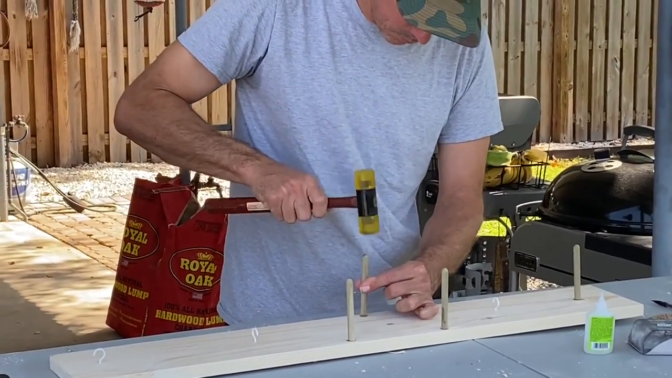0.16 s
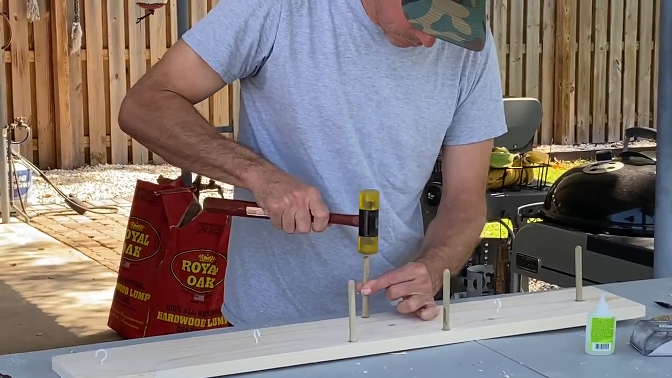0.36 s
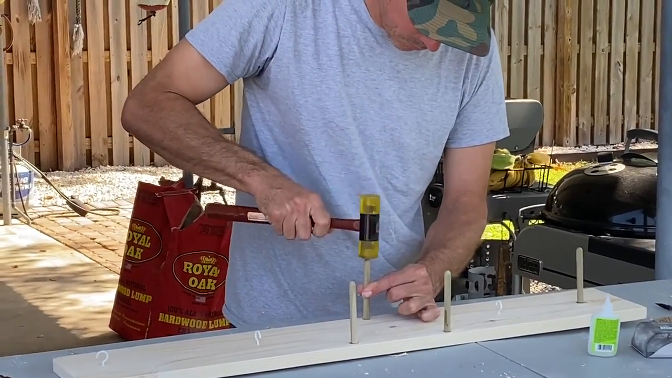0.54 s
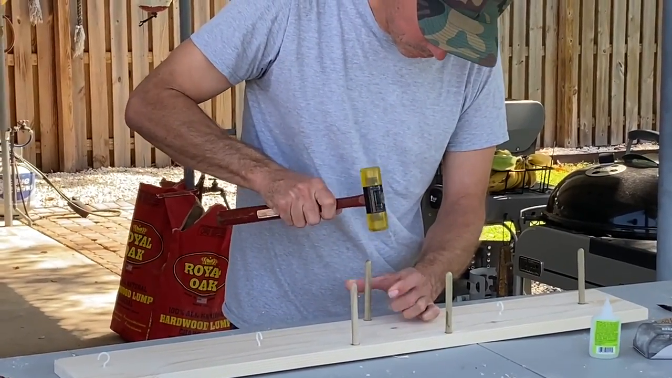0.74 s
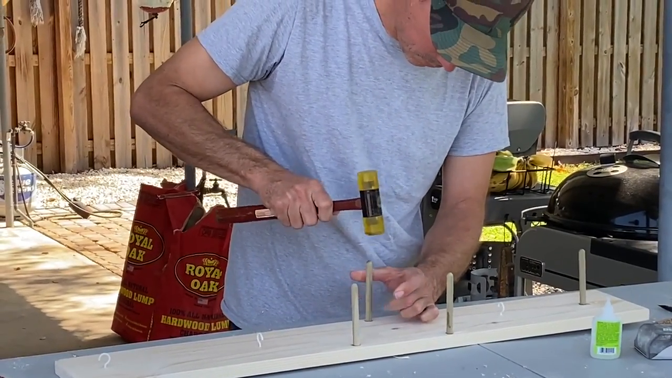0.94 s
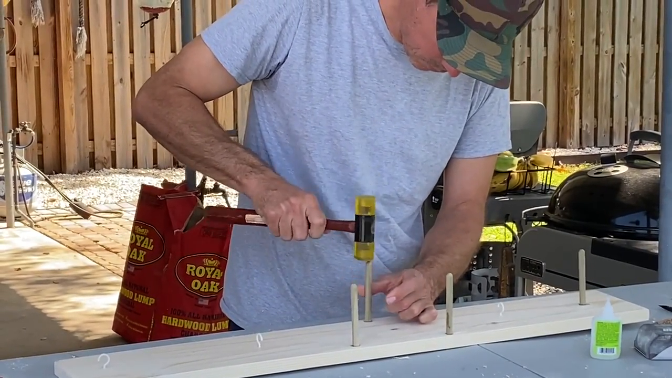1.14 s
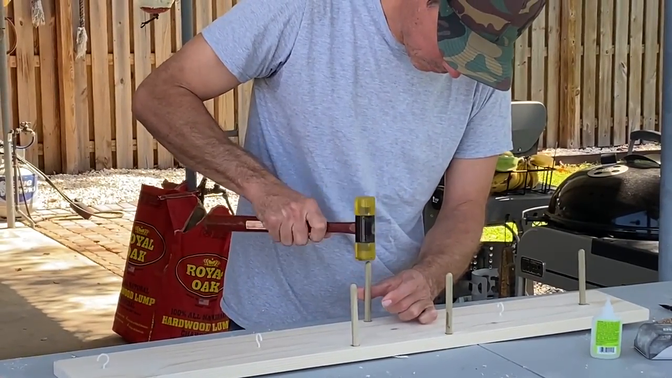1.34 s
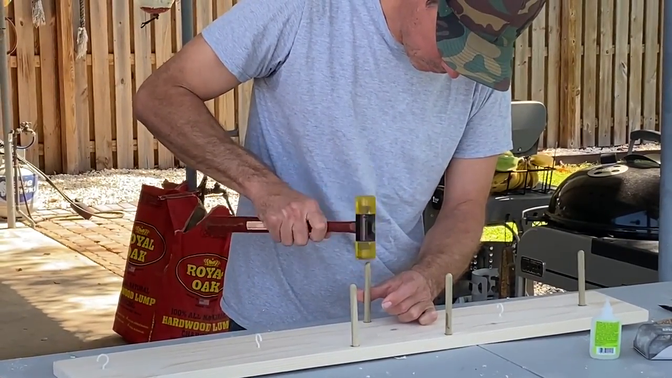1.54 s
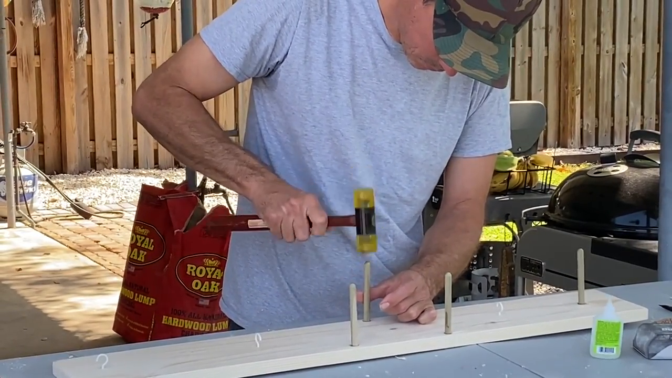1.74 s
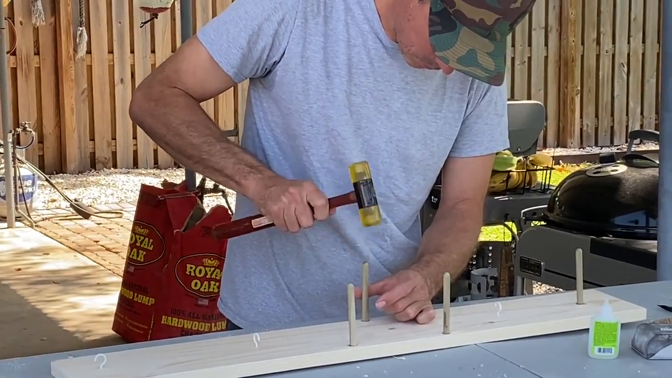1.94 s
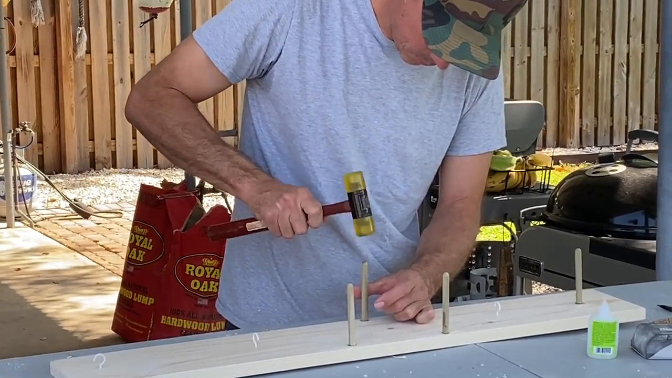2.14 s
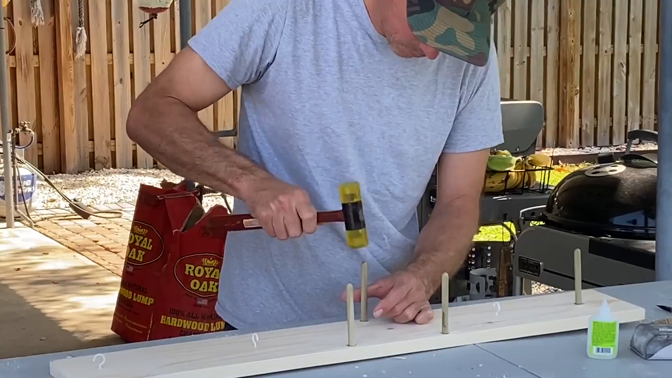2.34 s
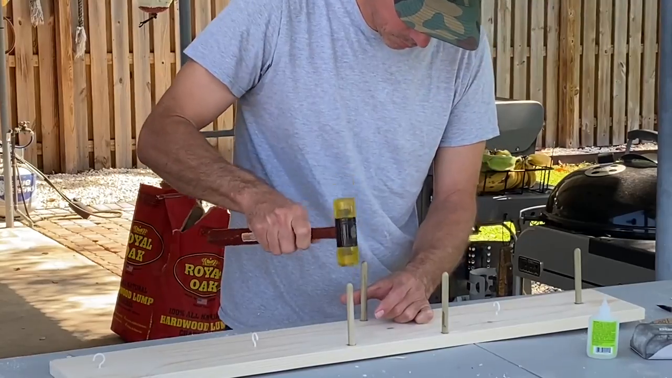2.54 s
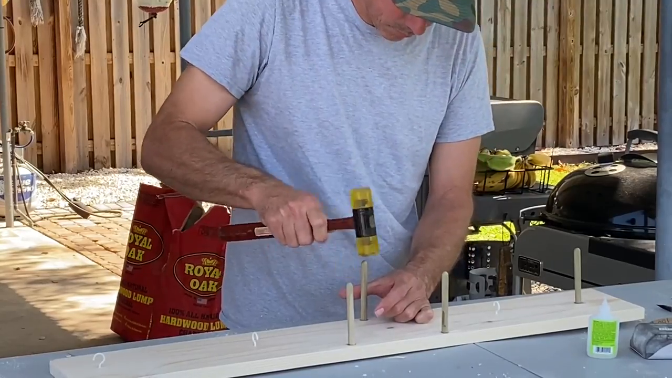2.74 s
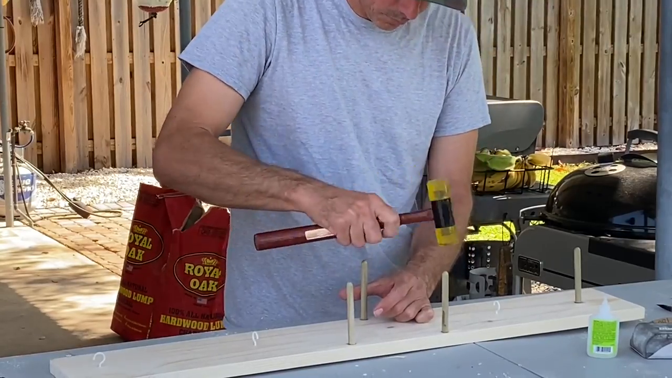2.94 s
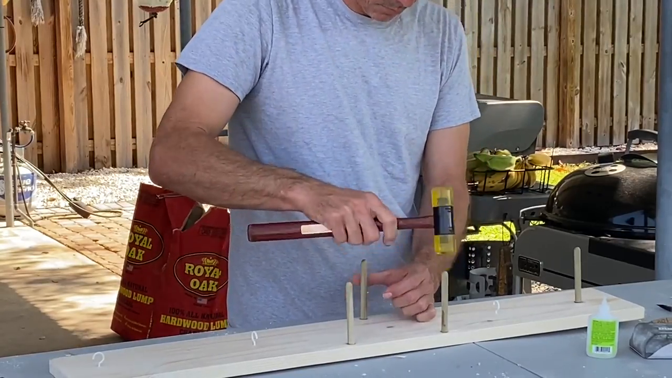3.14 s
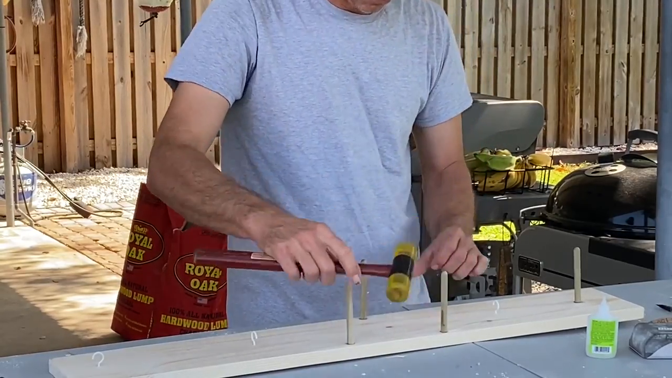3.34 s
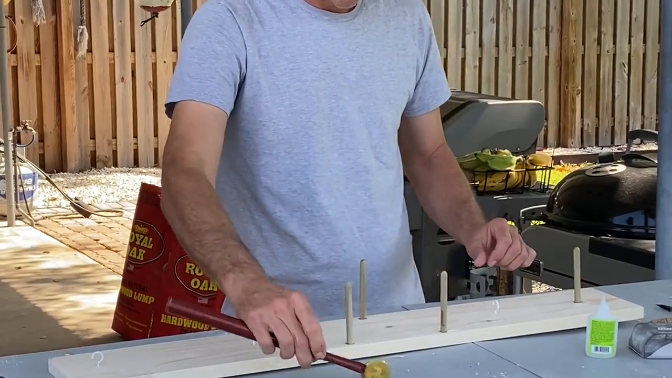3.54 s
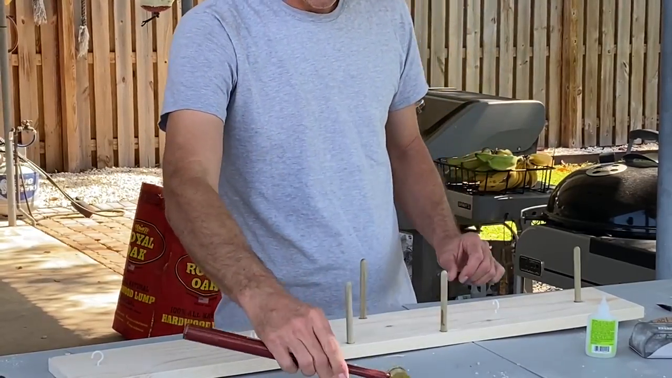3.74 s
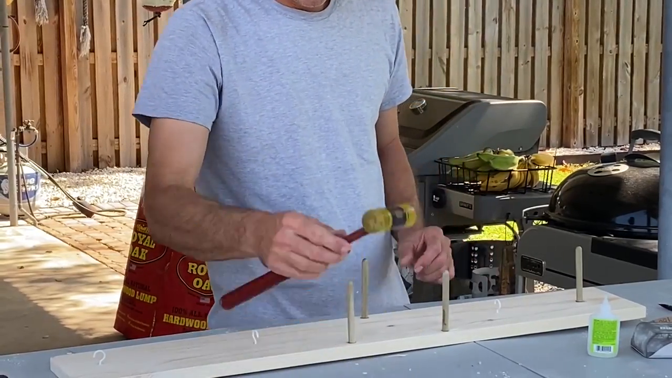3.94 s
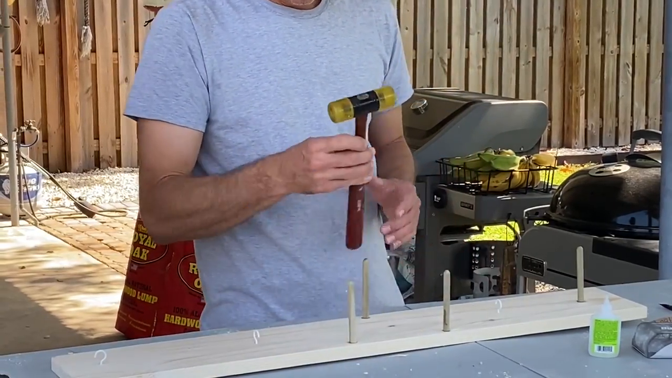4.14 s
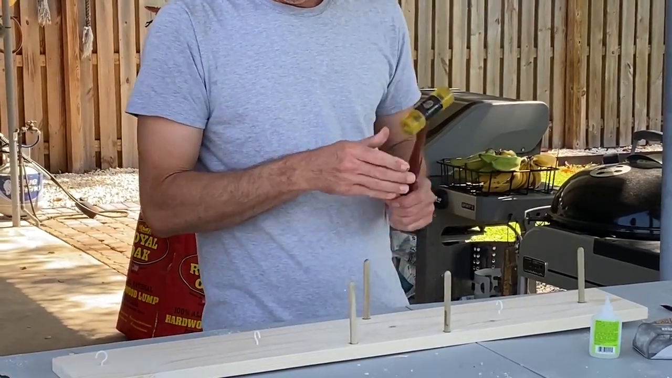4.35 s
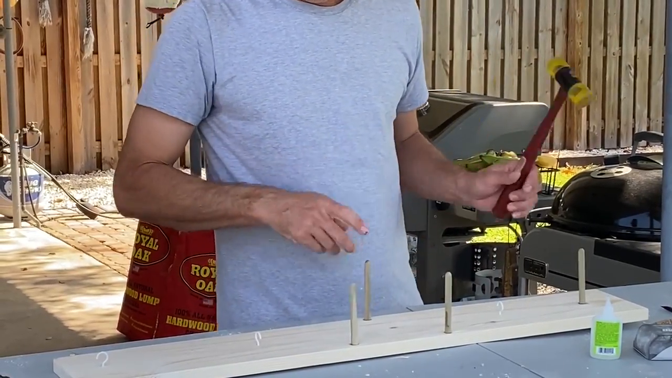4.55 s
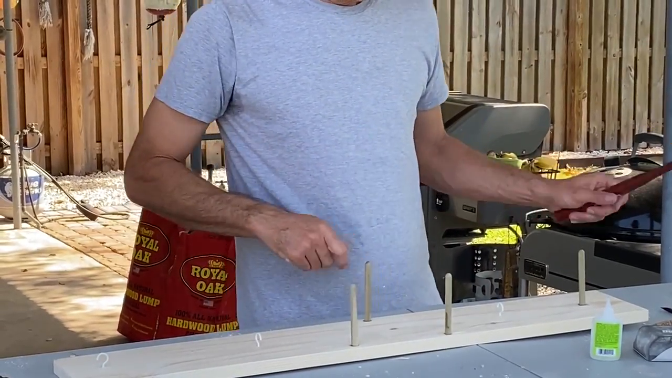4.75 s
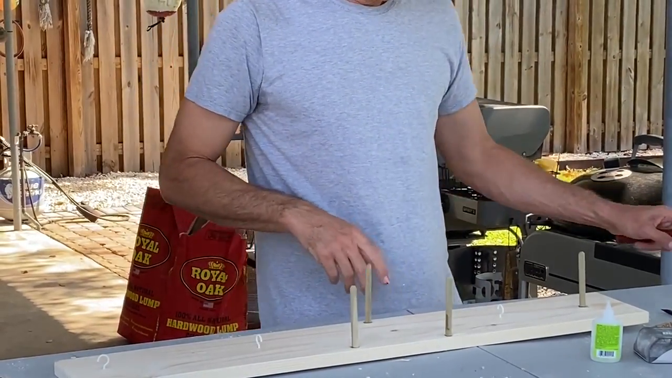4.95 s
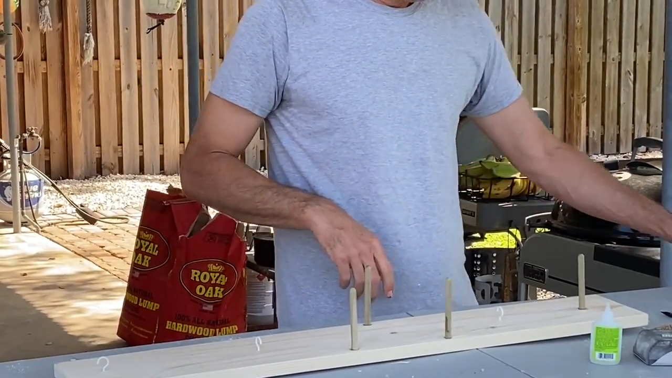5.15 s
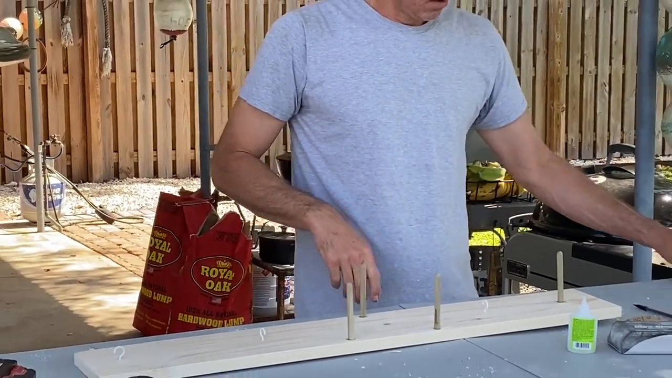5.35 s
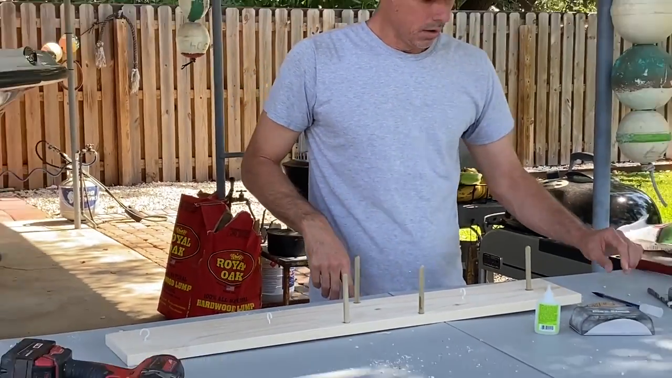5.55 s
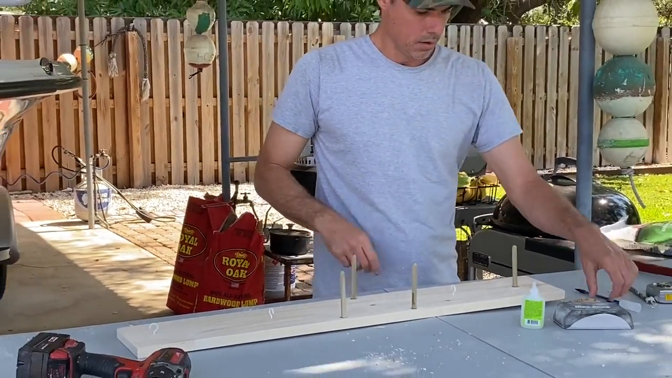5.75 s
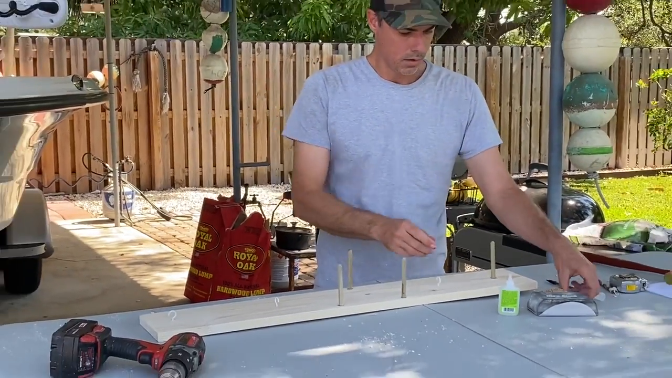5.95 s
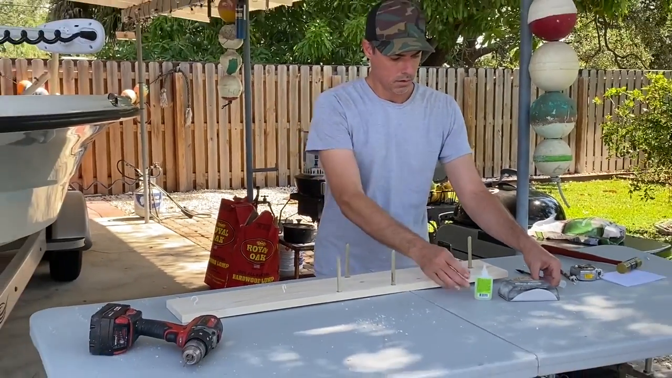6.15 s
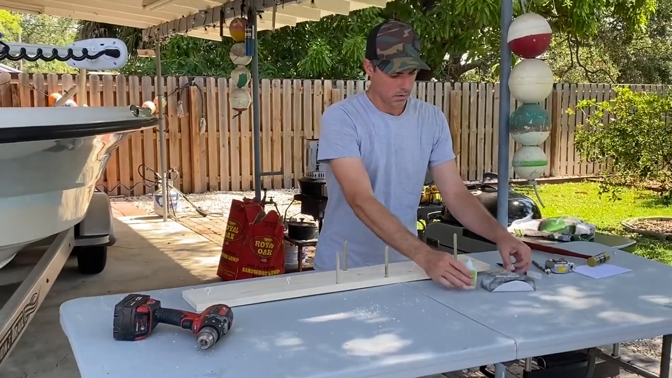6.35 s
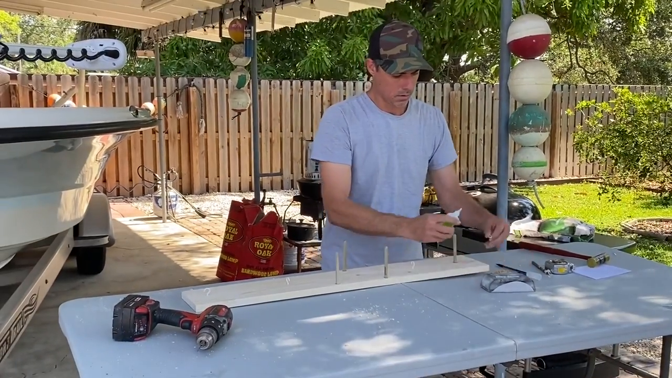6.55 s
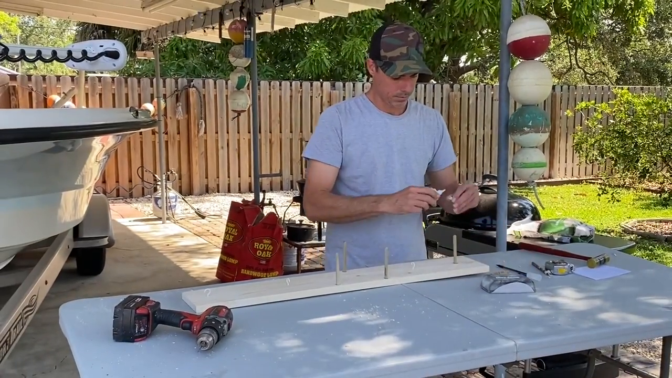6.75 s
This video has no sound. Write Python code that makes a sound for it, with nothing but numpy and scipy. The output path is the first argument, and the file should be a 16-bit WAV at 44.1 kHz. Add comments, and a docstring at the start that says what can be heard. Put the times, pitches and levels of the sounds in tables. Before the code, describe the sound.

Sharp woody mallet taps with hollow table thumps under an open shelter, then soft rumbling knocks, cloth rustle, faint birds and low wind.

```python
"""Wooden pegs are driven into a board: ticks, short woody rings and hollow table thumps, then lighter knocks.
The board lies on a folding table under an open shelter; a plastic-faced mallet strikes, then is laid down.
Hits are noise ticks and decaying sine modes; roof, fence and far walls answer with shaped noise.
Clicks, cloth, whistles, wind on the microphone pair and distant air are filtered noise; a trill is swept sines."""
import sys
import numpy as np
from scipy import signal
from scipy.fft import rfft, irfft, next_fast_len
from scipy.io import wavfile
from scipy.ndimage import uniform_filter1d

SR = 44100
rng = np.random.default_rng(int(sys.argv[2]) if len(sys.argv) > 2 else 0)


def digitize_waveform(pressure):
    """Quantize a signal to 16-bit integers and store it at the path in sys.argv[1].

    Rows of a 2-D input are taken as channels; values are limited to [-1, 1].
    """
    field = np.atleast_2d(pressure).T
    bounded = np.clip(field, -1, 1)
    quanta = np.round(bounded * 32767).astype(np.int16)
    wavfile.write(sys.argv[1], SR, quanta)


N = 303849
TIME = np.arange(N) / SR
SIZE = 2 * next_fast_len(N // 2 + SR // 20)  # padded transform length in samples
HZ = np.fft.rfftfreq(SIZE, 1 / SR)

# Levels in the tables are relative to the layer they shape.
# mallet on peg: [t/s, ring level/dB, tick level/dB, brightest ring f/Hz, ring focus/(dB per octave squared),
# rise/s, time until the head damps the ring/s, table thump level/dB, brightest thump f/Hz, echo level/dB]
PEG_BLOWS = [(.037, -.5, -22.5, 2200, 5.5, 0.00017, 0.0042, -23, 190, -24),
             (.2845, 1.5, -20.5, 2300, 2.5, 0.00099, 0.0046, -17.5, 190, -22),
             (.516, -.5, -20.5, 2400, 4.5, 0.0012, 0.0029, -22.5, 200, -21.5),
             (1.096, -1, -22.5, 1000, 2, 0.00042, 0.0084, -16.5, 290, -19.5),
             (1.3415, 1, -14.5, 1600, 17.5, 0.001, 0.0051, -21.5, 200, -23),
             (1.571, 1, -14, 1700, 22, 0.00055, 0.0057, -23.5, 200, -22),
             (1.792, 6, -18, 1000, 1.5, 0.0015, 0.0033, -18, 220, -20),
             (2.0195, 3, -16, 1100, 2, 0.00081, 0.0032, -18.5, 210, -21),
             (2.244, -1.5, -22, 1000, 1.5, 0.0004, 0.02, -18, 300, -22.5),
             (2.6075, 6.5, -28, 1200, -0.5, 0.01, 0.0064, -21.5, 215, -25),
             (3.030, -5.5, -42.5, 1000, 1, 0.0032, 0.0098, -17.5, 360, -23.5)]
# mallet touching down on the table: [t/s, ring level/dB, thump level/dB, brightest thump f/Hz, echo level/dB]
TABLE_KNOCKS = [(3.575, -44, -20.5, 130, -45.5), (3.603, -47, -39, 250, -51),
                (5.214, -31.5, -24.5, 275, -36), (5.242, -32.5, -27, 275, -37), (5.288, -37, -29, 320, -39),
                (5.3348, -23.5, -36, 450, -33), (5.362, -40, -32, 300, -44), (5.3955, -33, -31, 290, -43),
                (5.427, -39, -36, 290, -48)]
# modes of board and peg: [f/Hz, level/dB]
BOARD_MODES = [(480, -6), (730, 2.5), (1070, -4.5), (1410, -1.5), (1650, -2.5), (1900, -9), (2140, -1),
               (2360, -4.5), (2640, -1), (2830, -9), (3150, -10), (3700, -5), (4500, -7), (5350, -10),
               (6000, -7), (6470, -17), (7300, -10)]
# modes of the hollow table top: [f/Hz, level/dB, t60/s]
TABLE_MODES = [(68, 4, .45), (136.9, -4, 0.35), (192, 4.5, 0.22), (211.4, 1, 0.4), (235, 4, 0.29),
               (310, -7, .25), (382, -2, 0.42), (428, -2.5, .25), (478, 0.2, 0.21), (524, -13, 0.11),
               (691, -11, .25), (738, -8, .25), (1110, -15, 0.26)]
# colour of the contact tick: [f/Hz, level/dB]
TICK_COLOUR = [(500, -18.5), (2000, -0.5), (5000, 10), (8000, 0.5), (11000, -8.5), (16000, -20.5)]
# roof and fence echoes by band: [f/Hz, level/dB, early t60/s, late share/dB, late t60/s]
ECHO_BANDS = [(144.4, 3.5, .35, -28, 0.92), (300, .5, 0.3, -11.5, 0.98), (556, 2, 0.38, -38, 0.79),
              (1080, -1.5, 0.24, -25, 0.72), (1610, -1.5, 0.25, -21.5, 1.), (2500, 2.5, 0.15, -23, 0.65),
              (3250, -9.5, 0.18, -15.5, 0.8), (5000, -14, 0.24, -14.5, 0.73),
              (7960, -11.5, 0.092, -22, 0.41), (11000, -29, 0.28, -30.5, .6), (15000, -29, .22, -41.5, .5)]
# likeness of the echoes at the two microphones: [f/Hz, share from 0 to 1]
ECHO_LIKENESS = [(60, 1), (300, 0.94), (700, 0.85), (1400, 0.6), (2400, 0.94), (4000, 1)]
# colour of the far walls: [f/Hz, level/dB]
FAR_COLOUR = [(600, -30), (1000, -4), (1700, 0), (2400, -4), (3500, -14), (8000, -30)]
# small dry clicks of handling; the row at 5.334 s is the bright snap of the knock there: [t/s, starting
# level/dB, f/Hz, time of a 20 dB fall/s]
DRY_CLICKS = [(3.27, -57, 8040, .004), (3.289, -54, 9400, 0.036), (3.861, -42.5, 6140, 0.036),
              (3.871, -43.5, 4500, 0.023), (4.426, -60, 11000, 0.033), (4.536, -64, 11000, .02),
              (4.80, -66, 8900, 0.036), (5.204, -58, 6000, .01), (5.334, -36.5, 12800, 0.019),
              (6.043, -48.5, 2400, 0.036), (6.34, -59, 2600, .01)]
# cloth and feet: [loudest t/s, level/dB, time of a 20 dB rise/s, time of a 20 dB fall/s]
CLOTH_RUSTLES = [(3.55, -65, .12, .12), (3.69, -69, .05, .12), (4.41, -58.5, .14, .2),
                 (5.54, -59.5, .07, .3), (5.756, -68.5, .2, .2), (5.95, -54.5, .07, .35),
                 (6.07, -56.5, .2, .13), (6.288, -63, .2, .15)]
# colour of the cloth hiss: [f/Hz, level/dB]
CLOTH_COLOUR = [(2000, -6.5), (3500, -4), (5500, 4.5), (7000, -4), (9000, -15), (13000, -19.5)]
# far bird whistles blurred by echoes: [loudest t/s, level/dB, 20 dB rise/s, 20 dB fall/s, f/Hz]
BIRD_WHISTLES = [(.728, -53.5, .15, .14, 4330), (.934, -55, .05, .2, 4370), (1.015, -54, .03, .08, 4350),
                 (1.28, -45.5, .1, .3, 4380), (5.61, -59, .06, .09, 4430), (5.76, -62, .16, .12, 4270),
                 (5.93, -63, .04, .2, 4350), (6.048, -54, .2, .3, 4370), (6.28, -59, .2, .24, 4170)]
# quick rising bird notes: [t/s, level/dB]
BIRD_TRILL = [(0.89, -50.5), (0.921, -59), (.960, -55), (.998, -49)]
# steady wind: [t/s, level/dB]
STEADY_WIND = [(0, -40), (.3, -35), (.6, -36), (.9, -42), (1.3, -44), (1.8, -36), (2.3, -41), (2.8, -50),
               (3.2, -39), (3.6, -39), (3.9, -40), (4.2, -33), (4.55, -40), (4.85, -43), (5.3, -52),
               (5.6, -41), (6.2, -41), (6.89, -39)]
# single gusts: [strongest t/s, level/dB, time of a 20 dB rise/s, time of a 20 dB fall/s]
WIND_GUSTS = [(3.1, -32, .1, .2), (3.38, -40, .05, .06), (4.07, -26, .1, .15), (4.43, -20, .07, .1),
              (4.62, -31, .05, .08), (4.70, -25, .05, .08), (5.0, -28.5, .04, .07), (5.51, -32, .15, .1),
              (5.8, -33, .05, .15), (5.9, -31, .1, .1), (6.05, -31, .05, .12), (6.26, -33, .07, .2),
              (6.48, -33, .04, .15), (6.68, -32, .06, .08), (6.86, -30, .04, .08)]
# colour of wind on the microphone housing: [f/Hz, level/dB]
WIND_COLOUR = [(12, -53), (20, -19), (47, 1.5), (70, 1.5), (145, -18), (172, -25.5), (211, -27), (253, -33),
               (300, -38.5), (390, -64.5), (660, -120)]
# colour of the distant outdoor air: [f/Hz, level/dB]
AIR_COLOUR = [(70, -30), (120, -7.5), (150, -9), (200, -20.5), (270, -23), (600, -26), (850, -27),
              (1900, -41), (2900, -48.5), (5000, -56.5), (9000, -66.5), (16000, -85)]
# likeness of the air at the two microphones: [f/Hz, share from 0 to 1]
AIR_LIKENESS = [(60, .97), (150, .88), (380, .5), (700, 0), (1500, 0), (2600, .85), (4000, .99)]
# phase by which the left microphone leads: [f/Hz, lead/rad]
LEFT_LEAD = [(300, 0), (1640, .5), (2150, .15), (7500, 0), (8900, -3.1), (9560, -3.5), (10500, -5.8),
             (11600, -6.5), (12500, -8.7), (13400, -9.4), (14600, -12.1), (16400, -12.7)]

# Focus is in dB per octave squared, echo tilt in dB per octave.
# Punch is extra strength of the thump's first cycles; a resting mallet mutes the table sooner.
BLOW_SHARED = dict(thump_focus=3.5, punch=.43, rebound_db=-5.5, echo_tilt=1.5)
KNOCK_SHARED = dict(ring_hz=2380, ring_focus=18, rise_s=.001, hold_s=.008,
                    thump_focus=25, punch=2.2, rebound_db=-16, echo_tilt=-1.2)


def amp(db):
    """Amplitude factor of a level in dB."""
    return 10 ** (np.asarray(db) / 20)


def evened(x):
    """Signal scaled to an RMS of one."""
    return x / np.sqrt(np.mean(x ** 2) + 1e-20)


def read(points, hz):
    """Table value at each frequency, interpolated along log frequency."""
    f, value = np.transpose(points)
    return np.interp(np.log(hz + 1), np.log(f + 1), value)


def add(mix, s, sound):
    """Lay a sound into the mix at s seconds."""
    part = mix[round(s * SR):][:len(sound)]
    part += sound[:len(part)]


def coloured(x, spectrum):
    """Filter a signal by a table of levels over frequency."""
    return irfft(rfft(x, SIZE) * amp(read(spectrum, HZ)), SIZE)[:N]


def diffuse(likeness):
    """Spectra of two noises that share part of their sound, as at two spaced microphones."""
    left, other = rfft(rng.standard_normal((2, SIZE)))
    share = np.clip(read(likeness, HZ), 0, 1)
    return np.array([left, share * left + np.sqrt(1 - share ** 2) * other])


def swells(rows):
    """Levels that climb to a peak and fall away straight in dB, summed as power."""
    power = np.zeros(N)
    for s, db, rise, fall, *_ in rows:
        distance = np.where(TIME < s, (s - TIME) / rise, (TIME - s) / fall)
        power += amp(2 * db - 40 * distance)
    return np.sqrt(power)


def strikes():
    """Peg blows and table knocks as named settings, completed by what each kind shares."""
    columns = ["s", "ring_db", "tick_db", "ring_hz", "ring_focus", "rise_s", "hold_s",
               "thump_db", "thump_hz", "echo_db"]
    blows = [dict(zip(columns, row), **BLOW_SHARED) for row in PEG_BLOWS]
    knocks = [dict(s=s, ring_db=ring_db, tick_db=ring_db - 16, thump_db=thump_db, thump_hz=thump_hz,
                   echo_db=echo_db, **KNOCK_SHARED)
              for s, ring_db, thump_db, thump_hz, echo_db in TABLE_KNOCKS]
    return blows + knocks


def head_tick():
    """Contact noise of the mallet head: a sharp burst over a longer chatter."""
    t = TIME[:900]
    contact, chatter = amp(11 - 60 * t / .002), amp(-60 * t / .013)
    return (contact + chatter) * rng.standard_normal(len(t))


def board_ring(hit):
    """Board and peg modes ring, higher ones dying sooner, until the head settles and damps them."""
    t = TIME[:SR // 3]
    hz, db = np.transpose(BOARD_MODES)
    away = np.minimum(hit["ring_focus"] * np.log2(hz / hit["ring_hz"]) ** 2, 18)
    weight = amp(db - away + 1.5 * rng.standard_normal(len(hz)))
    cycles = hz * t[:, None] + rng.random(len(hz))
    decay = amp(-60 * t[:, None] * hz / 150)
    ring = (weight * decay * np.sin(2 * np.pi * cycles)).sum(1) / np.linalg.norm(weight)
    damping = amp(-np.minimum(5200 * np.maximum(t - hit["hold_s"], 0), 11) - 460 * t)
    return ring * damping * np.minimum(t / hit["rise_s"], 1)


def table_thump(hit):
    """Hollow table modes build up over 1.2 cycles, with extra strength early, and die away."""
    t = TIME[:SR // 3, None]
    hz, db, t60 = np.transpose(TABLE_MODES)
    away = hit["thump_focus"] * np.log2(hz / hit["thump_hz"]) ** 2
    weight = amp(db - away + 1.2 * rng.standard_normal(len(hz)))
    bloom = np.minimum(t * hz / 1.2, 1)
    decay = amp(-60 * t / t60) * (.7 + hit["punch"] * np.exp(-t / .017))
    cycles = hz * t + .4 * rng.random(len(hz))
    return (weight * bloom * decay * np.sin(2 * np.pi * cycles)).sum(1)


def impacts(hits):
    """Each hit ticks, rings the board, then thumps the table twice as the board jumps and lands again."""
    ticks, body, t = np.zeros(N), np.zeros(N), TIME[:SR // 3]
    for hit in hits:
        s = hit["s"]
        add(ticks, s, amp(hit["tick_db"]) * head_tick())
        add(body, s, amp(hit["ring_db"]) * board_ring(hit))
        thump = amp(hit["thump_db"]) * table_thump(hit)
        add(body, s + .004, thump * np.minimum(t / .003, 1))  # the push crosses the board first
        add(body, s + .031, amp(hit["rebound_db"]) * thump * np.minimum(t / .0035, 1))
    return body + coloured(ticks, TICK_COLOUR)


def echoes(hits):
    """Roof and fence reflections: banded noise with a quick and a slow decay after every hit."""
    pair, out, t = diffuse(ECHO_LIKENESS), np.zeros((2, N)), TIME[:SR]
    centres = [band[0] for band in ECHO_BANDS]
    fence = 1 + .13 * np.exp(-((t - .033) / .0027) ** 2)  # the fence answers
    rise = (1 - np.exp(-(t / .00213) ** 2)) * fence
    for k, (hz, db, early, late_db, late) in enumerate(ECHO_BANDS):
        quick = rise * amp(-120 * t / early)  # powers, hence doubled dB
        slow = rise * amp(2 * late_db - 120 * t / late)
        power = np.zeros(N)
        for hit in hits:
            # echoes keep the ring's colour, late ones most
            away = np.minimum(hit["ring_focus"] * np.log2(hz / hit["ring_hz"]) ** 2, 5.5)
            level_db = db + hit["echo_db"] + hit["echo_tilt"] * np.log2(hz / 1500)
            decay = quick * amp(-1.1 * away) + slow * amp(-1.8 * away)
            add(power, hit["s"], amp(2 * level_db) * decay)
        band = list(zip(centres, np.eye(len(ECHO_BANDS))[k]))
        window = np.sqrt(read(band, HZ)) * (HZ > 90)
        out += np.sqrt(power) * evened(irfft(pair * window, SIZE)[:, :N])
    return out


def far_walls(hits_sound):
    """Distant walls return a smeared, late copy that keeps the pitch of each ring."""
    swell = swells([(.16, 0, .12, .24)])[:SR]  # loudest return at .16 s
    taps = irfft(diffuse(ECHO_LIKENESS), SIZE)[:, :SR] * swell
    taps /= np.linalg.norm(taps[0])
    return amp(-26) * signal.oaconvolve(coloured(hits_sound, FAR_COLOUR)[None], taps, axes=1)[:, :N]


def clicks():
    """Dry handling contacts and a knock's bright snap: short decaying bursts of noise around one pitch."""
    out, t = np.zeros(N), TIME[:4000]
    for s, db, hz, fall in DRY_CLICKS:
        edges = [hz * .56, min(hz * 1.38, SR / 2.2)]
        band = signal.butter(N=2, Wn=edges, btype="band", fs=SR)
        noise = evened(signal.lfilter(*band, rng.standard_normal(len(t))))
        add(out, s, amp(db - 20 * t / fall) * noise)
    return out


def rustle():
    """Rubbing cloth: hiss whose level flickers in fine grains."""
    flicker = amp(1.2 * evened(uniform_filter1d(rng.standard_normal(N), 150)))
    hiss = coloured(rng.standard_normal(N) * flicker, CLOTH_COLOUR)
    return swells(CLOTH_RUSTLES) * evened(hiss)


def bird_whistles(width_hz=300):
    """Far whistles: slow noise turned up to a gliding pitch, which makes them fuzzy."""
    s, *_, hz = np.transpose(BIRD_WHISTLES)
    turn = np.exp(2j * np.pi * np.cumsum(np.interp(TIME, s, hz)) / SR)
    lowpass = signal.butter(N=2, Wn=width_hz, fs=SR)
    slow = signal.lfilter(*lowpass, rng.standard_normal((2, N)))
    return swells(BIRD_WHISTLES) * evened((turn * (slow[0] + 1j * slow[1])).real)


def bird_trill():
    """Quick upward sweeps, smeared by the yard as by a decaying noise echo."""
    notes, t = np.zeros(N), TIME[:700]
    sweep_hz = 3400 + 1500 * np.sqrt(t / t[-1])
    note = np.sin(2 * np.pi * np.cumsum(sweep_hz) / SR) * np.hanning(len(t))
    for s, db in BIRD_TRILL:
        add(notes, s, amp(db) * note)
    smear = amp(-60 * TIME[:8000] / .2) * rng.standard_normal(8000)
    return notes + 1.2 * signal.oaconvolve(notes, smear / np.linalg.norm(smear))[:N]


def wind():
    """Wind on the microphone housing: lumpy low noise, steady with single gusts."""
    lumps = amp(2.5 * evened(uniform_filter1d(rng.standard_normal(N), 2500)))
    level = np.hypot(amp(np.interp(TIME, *np.transpose(STEADY_WIND))), swells(WIND_GUSTS))
    return level * evened(coloured(lumps * rng.standard_normal(N), WIND_COLOUR))


def air():
    """Distant outdoor murmur: diffuse noise that drifts in level."""
    slow = uniform_filter1d(uniform_filter1d(rng.standard_normal(N), 6000), 6000)
    drift = amp(1.2 * evened(slow))
    murmur = irfft(diffuse(AIR_LIKENESS) * amp(read(AIR_COLOUR, HZ)), SIZE)[:, :N]
    return amp(-46.5) * drift * evened(murmur)


def scene():
    """Sum the hits and their reflections with handling, birds, wind and air."""
    hits = strikes()
    struck = impacts(hits)
    near = struck + echoes(hits) + far_walls(struck) + clicks() + rustle()
    return near + bird_whistles() + bird_trill() + wind() + air()


def record(dry):
    """The microphone pair differs in phase by pitch and loses deep bass; loud peaks flatten; treble is cut."""
    lead = np.exp(1j * np.outer([1, 0], read(LEFT_LEAD, HZ)))
    bass_loss = HZ ** 2 / (HZ ** 2 + 45 ** 2)
    pair = irfft(rfft(dry, SIZE) * lead * bass_loss, SIZE)[:, :N]
    pair *= amp([[.15], [-.15]])  # left slightly louder
    flattened = .9 * np.tanh(pair / .9)
    band_limit = signal.firwin(511, 16600, window=("kaiser", 9), fs=SR)
    return signal.oaconvolve(flattened, band_limit[None], "same")


dry = scene()
out = record(dry)
digitize_waveform(out)
```